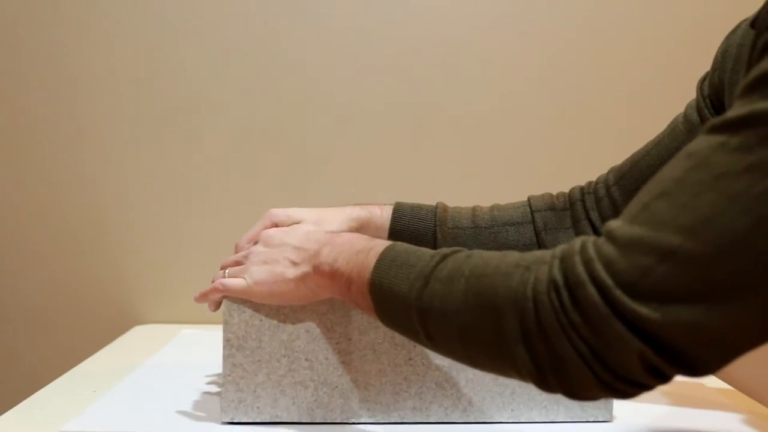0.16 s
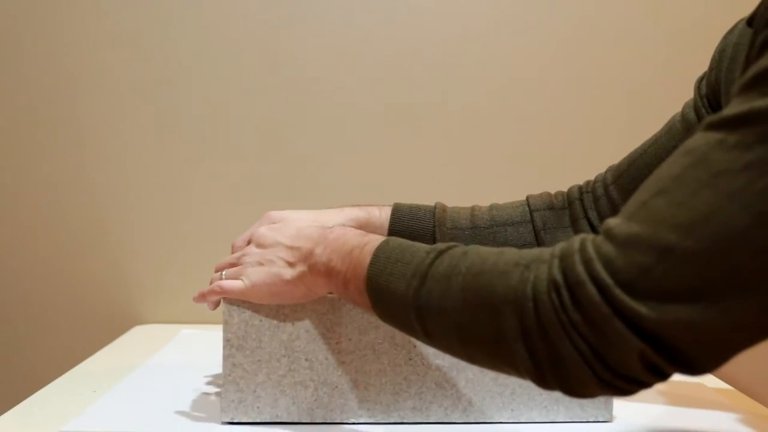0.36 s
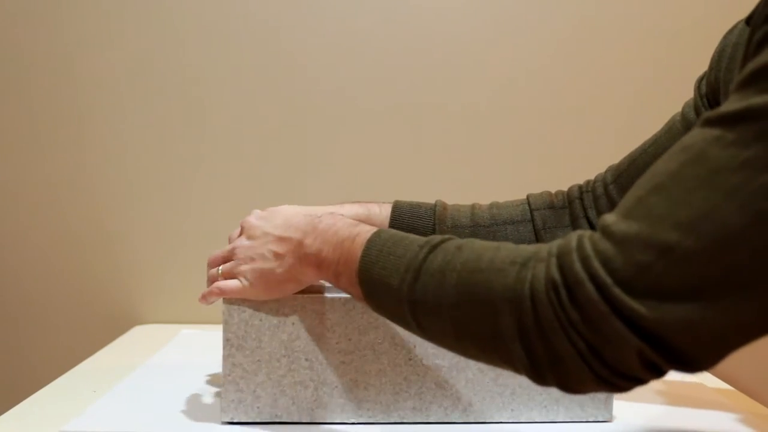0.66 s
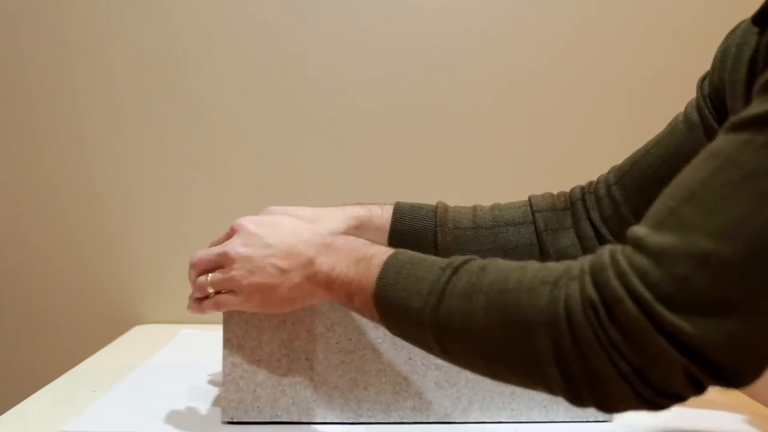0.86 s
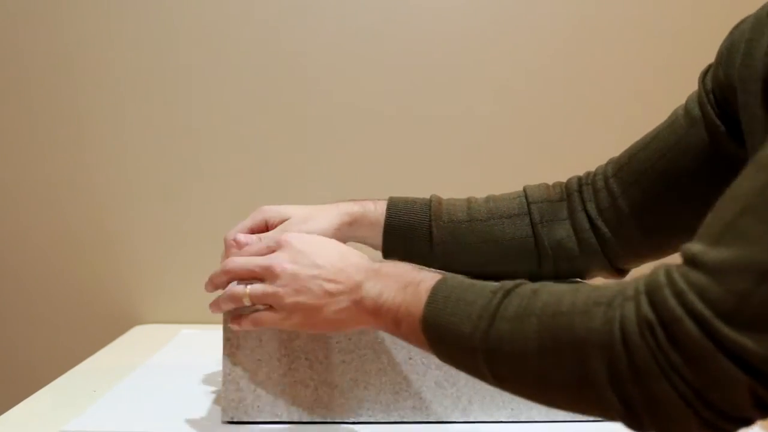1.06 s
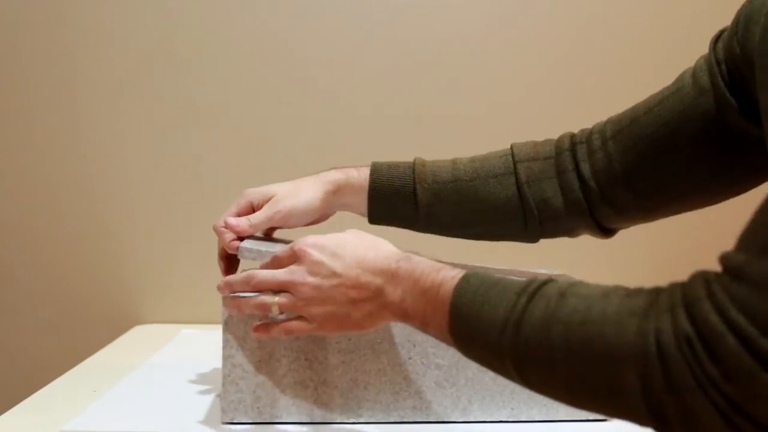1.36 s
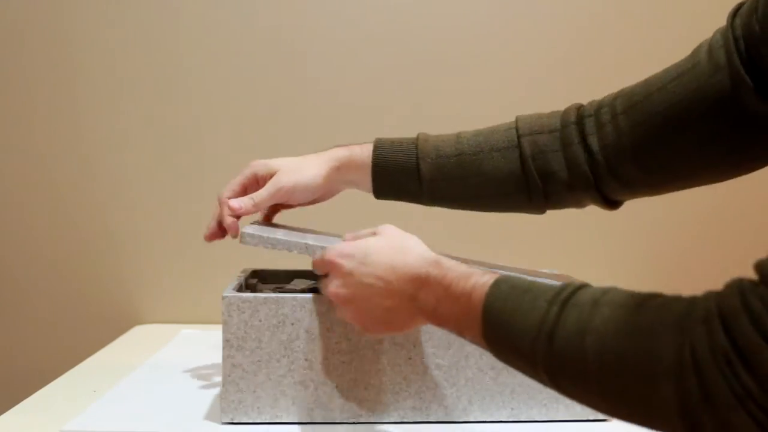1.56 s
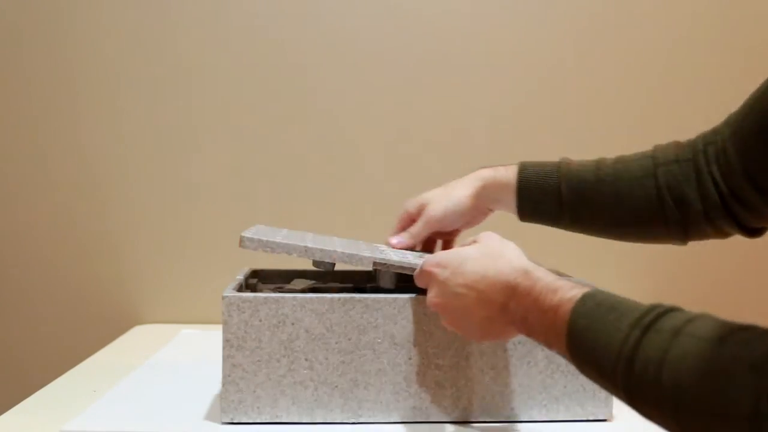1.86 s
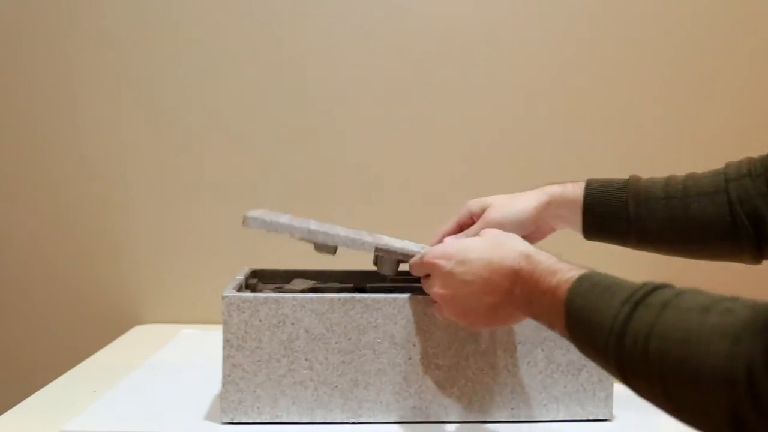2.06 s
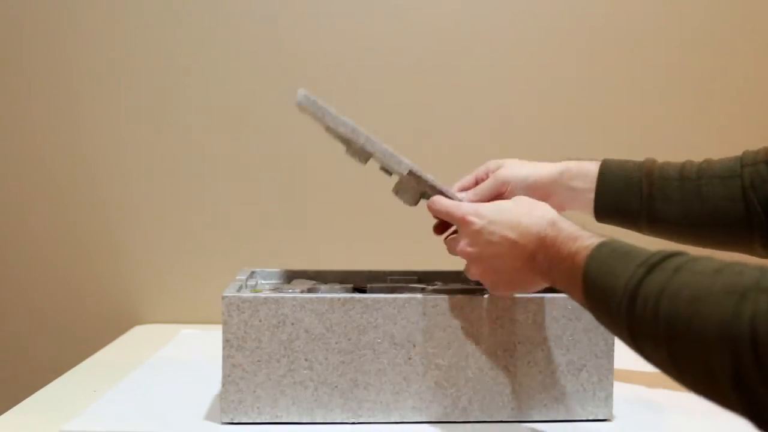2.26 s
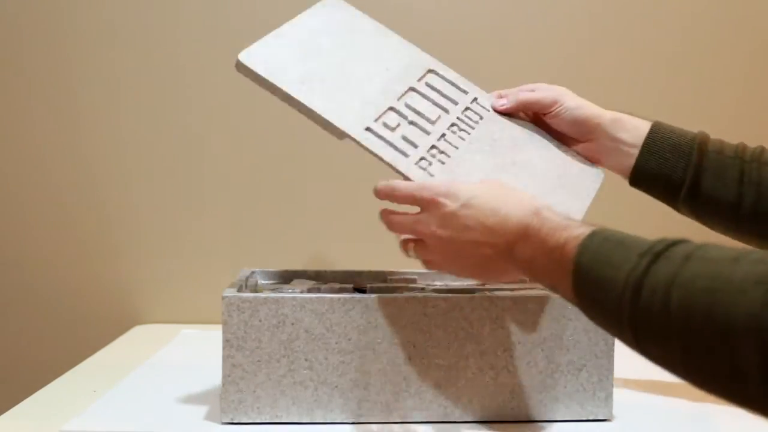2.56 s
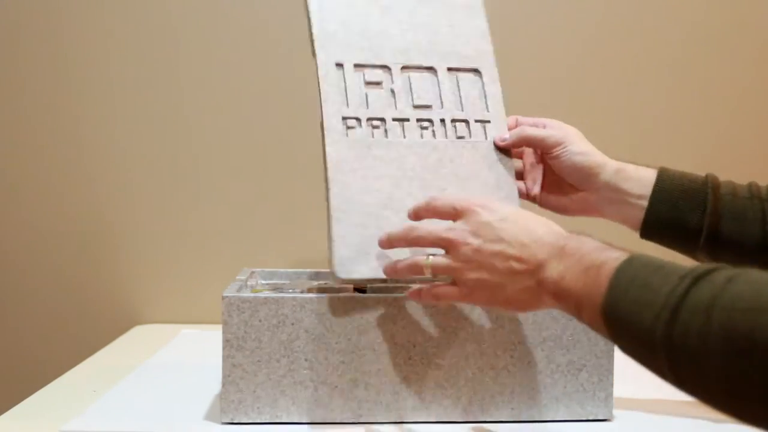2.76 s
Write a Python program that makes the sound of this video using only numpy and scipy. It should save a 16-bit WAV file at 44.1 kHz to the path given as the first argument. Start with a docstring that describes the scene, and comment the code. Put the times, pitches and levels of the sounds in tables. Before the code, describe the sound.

Close microphone in a small, quiet room: foam rim judders and drags, pops loose with a hollow knock, pauses with a tiny tap, then crisp rasping strokes as the lid is lifted and turned, ending in soft knocks.

```python
"""Foam lid pulled off its box

A tight foam lid is worked off a foam box on a table, close by in a small, dry room.
The rim judders, drags and pops free; fingers and lid rasp over the foam, and the lid lands with a short knock.
Rubbing is made of many tiny bead slips, filtered by the foam's resonances and swelling with each stroke.
Snags, knocks and a tap are short noise bursts, most with decaying tones; rumble and room air are filtered noise.
"""
import sys
import numpy as np
from scipy import signal
from scipy.fft import rfft, irfft, next_fast_len
from scipy.io import wavfile
from scipy.ndimage import map_coordinates

SR = 44100
rng = np.random.default_rng(int(sys.argv[2]) if len(sys.argv) > 2 else 0)


def to_wav(s):
    """Save 16-bit WAV."""
    ch = np.atleast_2d(s).T  # columns
    pcm = np.round(np.clip(ch, -1, 1) * 32767)  # PCM
    wavfile.write(sys.argv[1], SR, pcm.astype(np.int16))


N = 127890
T = np.arange(N) / SR  # time of every sample, in seconds
SIZE = next_fast_len(N + SR // 4, True)  # filter length, with spare room for tails
FREQ = np.maximum(np.fft.rfftfreq(SIZE, 1 / SR), 1)  # in Hz, kept above zero for logarithms

# Faint room air: pitch_hz, level_db (per Hz, relative)
AIR_SPECTRUM = [(25, -40.5), (95, -6.5), (345, -20), (473, -17.5), (1760, -24.5), (3220, -18.5),
                (16000, -43.5)]
AIR_DB = -68
# Dull rumbles as the hands load the box and lid: peak_s, rise_s, fall_s, level_db
RUMBLES = [(0.22, 0.017, 0.18, -46), (0.65, 0.14, 0.13, -40.5), (1.85, .12, 0.092, -59),
           (2.43, 0.066, 0.067, -50.5)]
# Colour of the rumble: pitch_hz, level_db (per Hz, relative)
RUMBLE_SPECTRUM = [(40, -28), (90, -9), (160, 0), (280, -4), (450, -28), (1500, -68)]

# Light taps of the loosened lid: start_s, level_db
TAPS = [(0.9698, -36.5), (0.972, -27), (0.977, -37)]
# Resonances heard in the tap: pitch_hz, width_hz, level_db (relative)
TAP_RESONANCES = [(620, 140, -2), (2450, 170, -2), (4200, 380, -7)]
TAP_DECAY_S = 0.0018  # time to fall to about a third

# Knocks of the lid against the box: start_s, level_db, tilt_db_per_octave, crumble_s
KNOCKS = [(0.7157, -11, -0.5, 0.005), (0.7622, -22.5, -0.5, 0.0051), (2.508, -25.5, 5.5, 0.018),
          (2.546, -20.5, -1, 0.006)]
# Ringing tones of the box: pitch_hz, level_db (relative), t60_s (time to fall 60 dB)
BOX_MODES = [(245, -6.5, 0.14), (302.6, 7.5, 0.076), (686, 0, .05), (1000, 2.5, 0.062), (2040, 10.5, 0.039),
             (2380, 2.5, .08), (3050, 5, .065), (3380, 0.5, .08), (3880, 3, 0.04)]
# Colour of a knock's crack before its tilt: pitch_hz, level_db (per Hz, relative)
KNOCK_CRACK = [(60, -34), (190, -10), (300, 2.5), (515, -6), (1200, 2), (1580, -8), (3420, -4),
               (11500, -25.5), (16000, -55.5)]
KNOCK_RING_DB, KNOCK_CRACK_DB = -4, -1  # added to each knock's level

# Snags, where the foam catches and lets go:
# start_s, crack_db, tilt_db_per_octave, crumble_s, ring_hz, ring_db
CATCHES = [(0.031, -30.5, -0.5, 0.0022, 1190, -32), (0.044, -31, -2, .005, 1280, -27),
           (0.129, -32.5, 3, 0.0034, 1290, -36.5), (0.434, -30.5, 1.5, 0.0013, 600, -58),
           (0.471, -20.5, -2, 0.0025, 940, -21), (0.497, -22.5, -16, 0.0016, 945, -16.5),
           (0.5806, -26.5, 7, 0.0013, 560, -21), (0.595, -30, 1, .0012, 410, -20),
           (0.61, -20.5, 0, 0.0022, 343, -15.5), (0.85, -35.5, -2, 0.0056, 3200, -32.5),
           (1.021, -42, -2, 0.011, 3120, -39.5), (1.078, -45, 1, .003, 1700, -52),
           (1.181, -33, 3.5, 0.0047, 1250, -34), (1.632, -28.5, 8, 0.0033, 665, -49),
           (1.677, -29.5, -6, 0.0057, 620, -20.5), (1.964, -38, -2, 0.0068, 1000, -37),
           (2.408, -31.5, 2, 0.0036, 3420, -18)]
CATCH_T60_S, RING_ATTACK_S = 0.027, 0.00031
LOW_CUT_HZ = 124  # keeps the blows' sudden starts from adding bass

# Strokes while gripping: peak_s, rise_s, fall_s, rasp_db, body_over_rasp_db, fizz_over_rasp_db
GRIP = [(0.052, 0.058, 0.012, -44, -8, -9.5), (0.09, 0.052, 0.019, -41.5, -18, -7.5),
        (0.13, 0.046, 0.04, -42, -16, -5.5)]
# Juddering rim: peak_s, rise_s, fall_s, rasp_db, body_over_rasp_db, fizz_over_rasp_db
JUDDER = [(0.216, 0.038, 0.021, -41, 3, -31.5), (0.286, 0.076, 0.081, -24, -3, -6),
          (0.345, 0.044, 0.067, -36, -2, -35)]
# Dragging rim: peak_s, rise_s, fall_s, rasp_db, body_over_rasp_db, fizz_over_rasp_db
DRAG = [(0.475, 0.038, 0.045, -38.5, -0.5, -6), (0.548, 0.042, 0.12, -35.5, -1, -6),
        (0.636, 0.035, 0.051, -24.5, -3, -3), (0.688, 0.1, 0.05, -31.5, -19.5, -7.5),
        (0.77, 0.022, 0.033, -37.5, 0.5, -16), (0.825, 0.028, 0.017, -49.5, -19, -6.5),
        (0.917, 0.0085, 0.03, -63, -6, 14)]
# Gripping again: peak_s, rise_s, fall_s, rasp_db, body_over_rasp_db, fizz_over_rasp_db
REGRIP = [(1.137, 0.062, 0.034, -45.5, -10.5, 3.5), (1.188, 0.027, 0.071, -39.5, -9, -3)]
# Lifting: peak_s, rise_s, fall_s, rasp_db, body_over_rasp_db, fizz_over_rasp_db
LIFT = [(1.321, 0.043, 0.043, -36.5, -3.5, 1.5), (1.406, 0.048, 0.058, -27, -14, -0.92),
        (1.453, 0.057, 0.069, -27.5, -15, 0.41), (1.521, 0.078, 0.09, -34, -3.5, -0.5)]
# Skimming: peak_s, rise_s, fall_s, rasp_db, body_over_rasp_db, fizz_over_rasp_db
SKIM = [(1.659, 0.034, 0.066, -50.5, 15.5, 8.5), (1.69, 0.019, 0.092, -35.5, -3, -1.5)]
# Brushing: peak_s, rise_s, fall_s, rasp_db, body_over_rasp_db, fizz_over_rasp_db
BRUSH = [(1.839, 0.045, 0.085, -51, 6, 8.5), (1.918, 0.045, 0.02, -40.5, -16, 1)]
# Shoving: peak_s, rise_s, fall_s, rasp_db, body_over_rasp_db, fizz_over_rasp_db
SHOVE = [(1.976, 0.026, 0.035, -35, -8.5, -6.5), (2.028, 0.042, 0.043, -36.5, -6, -7)]
# Sweeping: peak_s, rise_s, fall_s, rasp_db, body_over_rasp_db, fizz_over_rasp_db
SWEEP = [(2.135, 0.059, 0.037, -46, -13, 7), (2.176, 0.037, 0.04, -25.5, -11, -2),
         (2.221, 0.049, 0.045, -27.5, -5.5, -2.5), (2.259, 0.04, 0.053, -36.5, -9.5, -5)]
# Turning: peak_s, rise_s, fall_s, rasp_db, body_over_rasp_db, fizz_over_rasp_db
TURN = [(2.329, 0.057, 0.039, -31, -34.5, -4.5), (2.383, 0.064, 0.056, -29.5, -38, -2.5),
        (2.46, 0.055, 0.068, -35, -33, 0)]
# Landing: peak_s, rise_s, fall_s, rasp_db, body_over_rasp_db, fizz_over_rasp_db
LAND = [(2.517, 0.017, 0.051, -28, -11, -2.5), (2.551, 0.02, 0.04, -21, -3, -5),
        (2.605, 0.014, 0.026, -37, -12.5, 4.5), (2.635, 0.02, 0.012, -38.5, -14, 0),
        (2.709, 0.013, 0.016, -59.5, -6, -3)]
STROKE_SHAPE = 1.85  # a stroke is 20 dB down after its rise or fall time; 1 is pointed, 2 is rounded

# The foam's resonances shift with the grip. While gripping: pitch_hz, width_hz, level_db (relative)
GRIP_RES = [(1200, 44, -6), (3310, 91, 2.5)]
# Resonances in the judder: pitch_hz, width_hz, level_db (relative)
JUDDER_RES = [(445, 420, -4), (1637, 110, -6.5), (2220, 100, -5.5), (3320, 590, -6.5)]
# Resonances in the drag: pitch_hz, width_hz, level_db (relative)
DRAG_RES = [(335, 124, -6.5), (1106, 260, -10.5), (3450, 1100, -10.5)]
# Resonances in the second grip: pitch_hz, width_hz, level_db (relative)
REGRIP_RES = [(1243, 63, 5), (2430, 290, 2.5), (3970, 76, -7)]
# Resonances in the lift: pitch_hz, width_hz, level_db (relative)
LIFT_RES = [(702, 130, -2), (960, 110, 1), (2460, 260, -4), (3500, 450, -12)]
# Resonances in the skim: pitch_hz, width_hz, level_db (relative)
SKIM_RES = [(560, 300, 5), (1200, 150, 0), (1680, 70, 2), (3380, 300, -2)]
# Resonances in the brush: pitch_hz, width_hz, level_db (relative)
BRUSH_RES = [(670, 130, 6), (3400, 400, -2)]
# Resonances in the shove: pitch_hz, width_hz, level_db (relative)
SHOVE_RES = [(711, 100, 5), (1050, 300, 2), (2300, 220, 0), (2870, 220, 0)]
# Resonances in the sweep: pitch_hz, width_hz, level_db (relative)
SWEEP_RES = [(691, 64, 3.5), (1175, 110, -5.5), (1976, 91, 0.5), (2450, 170, -2), (3430, 170, 0.5),
             (14100, 1300, -27.5)]
# Resonances in the turn: pitch_hz, width_hz, level_db (relative)
TURN_RES = [(2140, 140, 2), (3560, 430, 2.3)]
# Resonances in the landing: pitch_hz, width_hz, level_db (relative)
LAND_RES = [(503, 170, 2), (1207, 90, -3), (1610, 110, -2), (1980, 90, -1), (2490, 110, 1), (3620, 520, 3)]

# Friction noise of foam wedged tight: pitch_hz, level_db (per Hz, relative)
TIGHT = [(50, -39), (205, -20), (320, -7), (1120, -3.5), (1870, -4), (3330, -6), (5810, -12.5),
         (11100, -17), (16000, -26)]
# Friction noise of foam sliding free: pitch_hz, level_db (per Hz, relative)
LOOSE = [(47, -61.5), (80, -28.5), (672, -0.5), (820, -15), (958, -5), (2720, -8.5), (3470, -5),
         (4830, -22), (14600, -31.5), (16000, -51)]
# Friction noise of foam held lightly: pitch_hz, level_db (per Hz, relative)
HELD = [(80, -47), (300, -14.5), (515, -10), (896, -12), (1170, -11), (2900, -6.5), (3620, -6),
        (9000, -12.5), (16000, -26)]

# Stick-slip of the wedged rim: time_s, rate_slips_per_s
SLIP_RATE = [(0.232, 128.6), (0.27, 141), (0.306, 127), (0.323, 67), (0.361, 28)]
FIRST_SLIP_S, SLIP_DECAY_S = 0.2318, 0.0012
SLIP_JITTER = 0.012  # random share of each gap between slips
BODY_CREEP, FIZZ_CREEP = 0.44, 0.12  # steady creep below and above FIZZ_HZ; a typical jump is 1
BODY_HZ, FIZZ_HZ = 900, 5000  # hollow body lies below, rasp between, fizz above
STUTTER_PER_S, STUTTER_DB = 330, 2
WANDER_PER_S, WANDER_WIDTH_HZ = 35, 372.4
DRIFT_PER_S, DRIFT_S = 14, 0.0007

# Echo levels compare with the direct sound; T60 is the time to fall 60 dB
NEAR_DB, NEAR_T60_S = -6.5, 0.025
ROOM_DB, ROOM_T60_S, ROOM_TREBLE_T60_S = -13.5, 0.2, 0.12
CEILING, TOP_HZ = 0.4, 16100  # largest output before the top cut, and the top cut itself


def undb(db):
    """Turn decibels into a gain."""
    return 10 ** (np.asarray(db) / 20)


def unit(x):
    """Scale to an average (rms) strength of 1."""
    return x / np.sqrt(np.mean(x ** 2))


def spectrum(points):
    """Join (Hz, dB) points into a gain at every frequency."""
    hz, db = np.array(points).T
    return undb(np.interp(np.log(FREQ), np.log(hz), db))


def colour(x, gain):
    """Filter with the given gain at every frequency, without sounding ahead of time."""
    # Folding the cepstrum (the transform of the log gain) gives a filter that only looks back.
    cepstrum = irfft(np.log(gain + 1e-6), SIZE)
    cepstrum[1:SIZE // 2] *= 2
    cepstrum[SIZE // 2 + 1:] = 0
    response = np.exp(rfft(cepstrum))
    return irfft(rfft(x, SIZE) * response, SIZE)[:N]


def fade(t, t60):
    """Die away steadily, 60 dB down after t60 seconds."""
    return np.exp(-np.log(1000) * t / t60)


def add(out, start, x):
    """Mix a short sound in at a time in seconds."""
    i = max(int(start * SR), 0)
    out[i:i + len(x)] += x[:N - i]


def walk(per_s):
    """Draw a smooth random curve through per_s random points each second."""
    return map_coordinates(rng.standard_normal(1024), [T * per_s], mode="mirror")


def room_air():
    """Faint steady noise of the air in the room."""
    return undb(AIR_DB) * unit(colour(rng.standard_normal(N), spectrum(AIR_SPECTRUM)))


def room(x):
    """Quick reflections from table and wall, then a short tail whose treble dies first."""
    t = T[:SR // 3]
    near, far = rng.standard_normal((2, len(t)))
    dull = signal.sosfilt(signal.butter(2, 4500, fs=SR, output="sos"), far)
    bright = far - dull
    near = near * fade(t, NEAR_T60_S) * (t > 0.002)
    far = (dull * fade(t, ROOM_T60_S) + bright * fade(t, ROOM_TREBLE_T60_S)) * (t > 0.007)
    response = (t == 0) + undb(NEAR_DB) * near / np.linalg.norm(near)
    response = response + undb(ROOM_DB) * far / np.linalg.norm(far)
    return signal.fftconvolve(x, response / np.linalg.norm(response))[:N]


def beads(rate, scatter_db):
    """Tiny slips of single foam beads, of uneven size, in clusters that stutter in strength."""
    hit = rng.random(N) < rate / SR
    sign = rng.choice([-1, 1], N)
    size_db = scatter_db * np.minimum(rng.exponential(size=N), 4)
    stutter_db = STUTTER_DB * walk(STUTTER_PER_S)
    return unit(hit * sign * undb(size_db + stutter_db))


def soft_beads():
    """Fingertips brush the foam: a dense, even rustle of beads."""
    return beads(7000, 1.5)


def rumble():
    """Shifting weight rumbles low through the foam."""
    effort = np.zeros(N)
    for peak, rise, fall, db in RUMBLES:
        away = np.maximum((peak - T) / rise, (T - peak) / fall)
        effort += undb(db - 20 * away)
    return effort * unit(colour(beads(900, 1), spectrum(RUMBLE_SPECTRUM)))


def tap():
    """The loosened lid settles with a light, hollow tap that chatters briefly."""
    out, t = np.zeros(N), T[:SR // 10]
    for start, db in TAPS:
        add(out, start, undb(db) * rng.standard_normal(len(t)) * np.exp(-t / TAP_DECAY_S))
    gain = np.zeros(len(FREQ))
    for hz, width, db in TAP_RESONANCES:
        gain += undb(db) / (1 + ((FREQ - hz) / (2 * width)) ** 2) ** 3
    return colour(out, unit(gain))


def crack(points, tilt_db, crumble):
    """A burst of collapsing beads that dies away within milliseconds."""
    t = T[:SR // 10]
    hz = np.maximum(np.fft.rfftfreq(len(t), 1 / SR), 1)
    gain = unit(np.interp(hz, FREQ, spectrum(points)) * undb(tilt_db * np.log2(hz)))
    noise = irfft(rfft(rng.standard_normal(len(t))) * gain, len(t))
    return noise * np.exp(-t / max(crumble, 1 / SR))


def knocks():
    """The lid pops out, rebounds and later lands: a crack and the hollow ring of the box."""
    out, t = np.zeros(N), T[:SR // 5]
    hz, mode_db, t60 = np.array(BOX_MODES).T[:, :, None]
    for start, db, tilt_db, crumble in KNOCKS:
        gain = undb(mode_db + tilt_db * np.log2(hz)) * rng.choice([-1, 1], hz.shape)
        tones = gain * np.sin(2 * np.pi * hz * t) * fade(t, t60)
        ring = np.sum(tones, axis=0) / np.linalg.norm(gain)
        add(out, start, undb(db + KNOCK_RING_DB) * ring)
        add(out, start, undb(db + KNOCK_CRACK_DB) * crack(KNOCK_CRACK, tilt_db, crumble))
    return out


def catches():
    """Each snag cracks and rings the patch of foam where it happens."""
    out, t = np.zeros(N), T[:SR // 5]
    envelope = fade(t, CATCH_T60_S) * (1 - np.exp(-t / RING_ATTACK_S))
    for start, crack_db, tilt_db, crumble, hz, ring_db in CATCHES:
        add(out, start, undb(crack_db) * crack(TIGHT, tilt_db, crumble))
        add(out, start, undb(ring_db) * np.sin(2 * np.pi * hz * t) * envelope)
    return out


def stick_slip():
    """The wedged rim jumps in a quick train: each jump is a bright spray of beads, with duller creep between."""
    when, rate = np.array(SLIP_RATE).T
    jumps, t = np.zeros(N), FIRST_SLIP_S
    for late, strength in rng.standard_normal((40, 2)):
        if t < when[-1]:
            jumps[int(t * SR)] = undb(1.4 * strength)
        t += (1 + SLIP_JITTER * late) / np.interp(t, when, rate)
    spray = signal.lfilter([1], [1, -np.exp(-1 / (SLIP_DECAY_S * SR))], jumps)
    grains = rng.choice([-1, 1], N)
    juddering = (T > when[0]) & (T < when[-1])
    out = np.zeros(N)
    for band, creep in (("low", BODY_CREEP), ("high", FIZZ_CREEP)):
        slips = (spray + creep) * grains
        slips = slips / np.std(slips[juddering])
        out += signal.sosfilt(signal.butter(3, FIZZ_HZ, band, fs=SR, output="sos"), slips)
    return out


def wander(x, patchy_db):
    """As the contact travels over the panel, neighbouring resonances swell and fade at random."""
    hz, t, z = signal.stft(x, SR, nperseg=256, noverlap=192)
    chance = rng.standard_normal((128, 256))
    grid = np.meshgrid(hz / WANDER_WIDTH_HZ, t * WANDER_PER_S, indexing="ij")
    swell = map_coordinates(chance, grid, mode="mirror")
    z = z * unit(undb(patchy_db * swell))
    return signal.istft(z, SR, nperseg=256, noverlap=192)[1][:N]


def drift(x):
    """The foam flexes under the hands, so its resonances bend slightly up and down."""
    moved_s = T + DRIFT_S * walk(DRIFT_PER_S)
    return map_coordinates(x, [moved_s * SR], order=5, mode="mirror")


def rub(slips, strokes, friction, resonances, grit_db, patchy_db):
    """Slips excite the foam's resonances over a broad grit; body, rasp and fizz swell and fall with each stroke."""
    power = (undb(grit_db) * spectrum(friction)) ** 2
    for hz, width, db in resonances:
        detune = (FREQ / hz - hz / FREQ) * hz / (1.4 * width)
        power = power + undb(db) ** 2 / (1 + detune ** 2) ** 2
    gain = np.sqrt(power)
    sound = rfft(drift(colour(wander(slips, patchy_db), gain)), SIZE)
    low = 1 / (1 + (FREQ / BODY_HZ) ** 8)
    high = 1 / (1 + (FIZZ_HZ / FREQ) ** 8)
    effort = np.zeros((3, N))  # power of body, rasp and fizz over time
    for peak, rise, fall, rasp, body, fizz in strokes:
        away = np.maximum((peak - T) / rise, (T - peak) / fall)
        on = away < 3
        level_db = np.array([[rasp + body], [rasp], [rasp + fizz]])
        effort[:, on] += undb(level_db - 20 * away[on] ** STROKE_SHAPE) ** 2
    out = np.zeros(N)
    for band, strength in zip((low, 1 - low - high, high), effort):
        # Dividing by the band's own power makes the stroke levels hold.
        out += irfft(sound * band, SIZE)[:N] * np.sqrt(strength / np.mean((gain * band) ** 2))
    return out


def rubbing():
    """The movements in order, each with a bead texture, one of three friction colours and its own resonances."""
    return (rub(soft_beads(), GRIP, HELD, GRIP_RES, grit_db=1, patchy_db=4.0)
            + rub(stick_slip(), JUDDER, TIGHT, JUDDER_RES, grit_db=-4.5, patchy_db=1.0)
            + rub(beads(3500, 1.5), DRAG, TIGHT, DRAG_RES, grit_db=-3.5, patchy_db=2.5)
            + rub(beads(3000, 3.1), REGRIP, LOOSE, REGRIP_RES, grit_db=6, patchy_db=5)
            + rub(beads(9000, 1.7), LIFT, LOOSE, LIFT_RES, grit_db=-0.5, patchy_db=3.5)
            + rub(beads(5000, 2.05), SKIM, LOOSE, SKIM_RES, grit_db=2, patchy_db=5.5)
            + rub(soft_beads(), BRUSH, LOOSE, BRUSH_RES, grit_db=3.5, patchy_db=4.5)
            + rub(beads(2000, 2.6), SHOVE, LOOSE, SHOVE_RES, grit_db=-0.5, patchy_db=5.5)
            + rub(beads(7000, 2.0), SWEEP, LOOSE, SWEEP_RES, grit_db=1.5, patchy_db=3)
            + rub(soft_beads(), TURN, HELD, TURN_RES, grit_db=2, patchy_db=4.5)
            + rub(beads(5000, 1.9), LAND, HELD, LAND_RES, grit_db=-5.0, patchy_db=5.0))


def scene():
    """Foam sounds in the room over faint room air; a low cut keeps the blows' sudden starts from adding bass."""
    low_cut = signal.butter(3, LOW_CUT_HZ, "high", fs=SR, output="sos")
    blows = signal.sosfilt(low_cut, catches() + tap() + knocks())
    air = room_air()
    foam = rubbing() + rumble() + blows
    return (room(foam) + air)[None]


def record(dry):
    """The recorder rounds off the sharpest peaks and cuts the top."""
    rounded = dry / (1 + (dry / CEILING) ** 4) ** 0.25
    return signal.sosfilt(signal.ellip(10, 0.2, 80, TOP_HZ, fs=SR, output="sos"), rounded)


dry = scene()
out = record(dry)
to_wav(out)
```